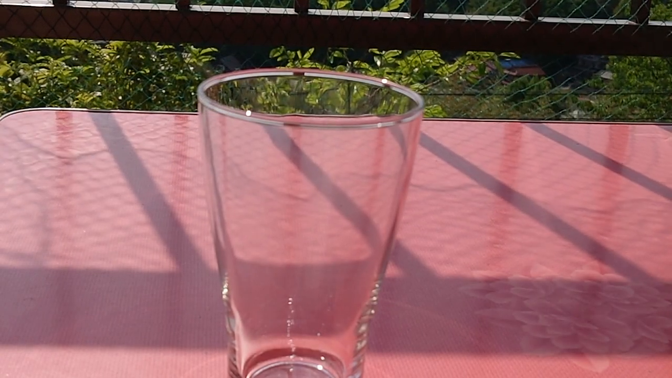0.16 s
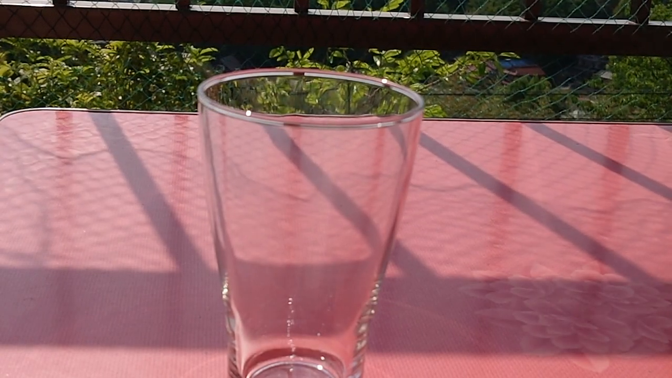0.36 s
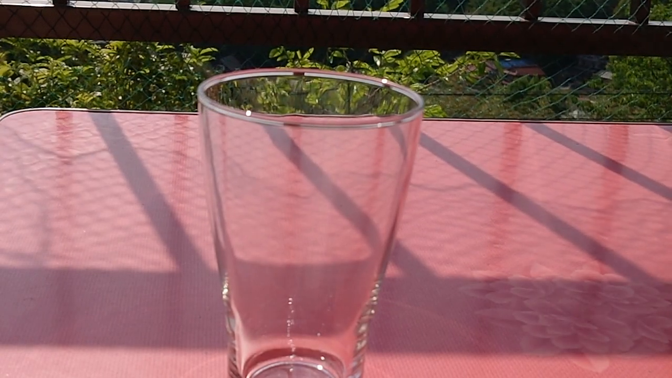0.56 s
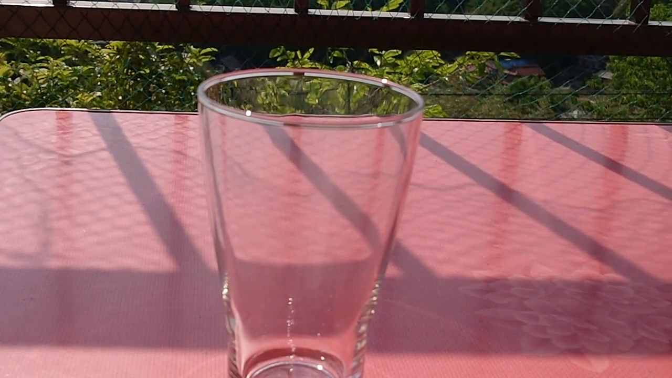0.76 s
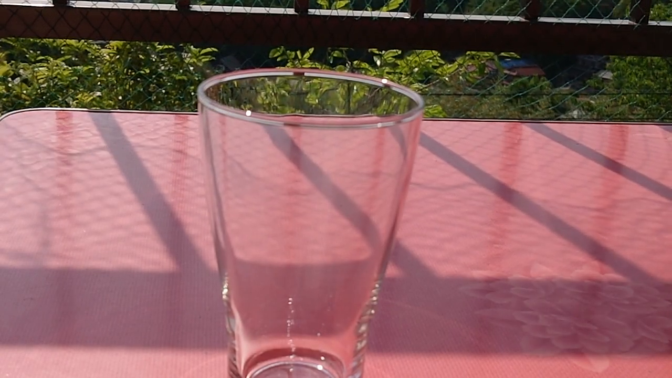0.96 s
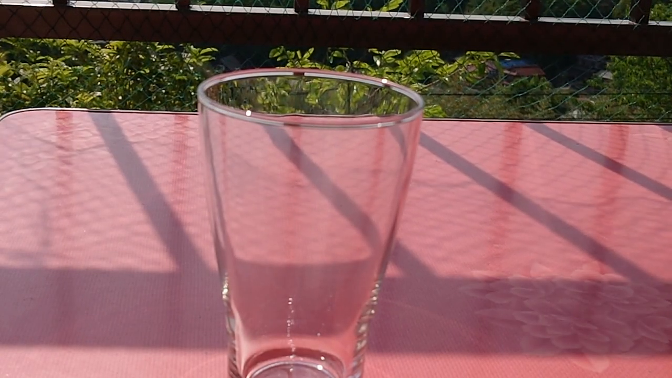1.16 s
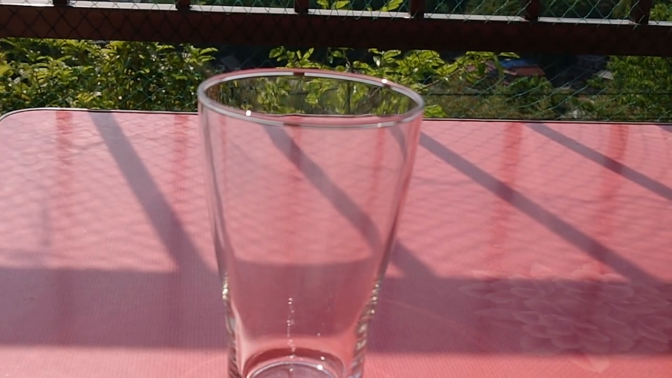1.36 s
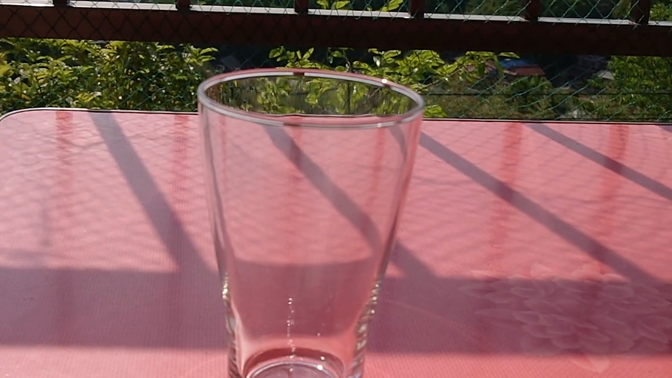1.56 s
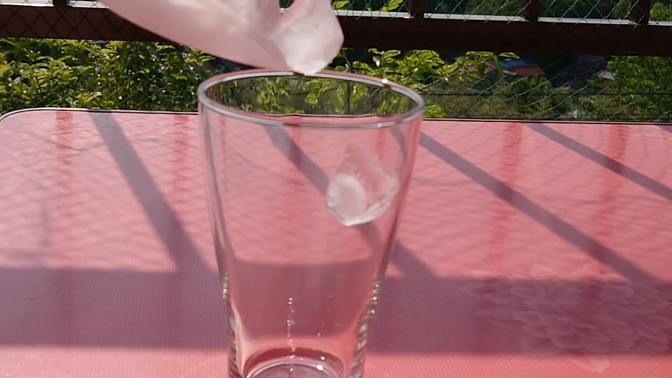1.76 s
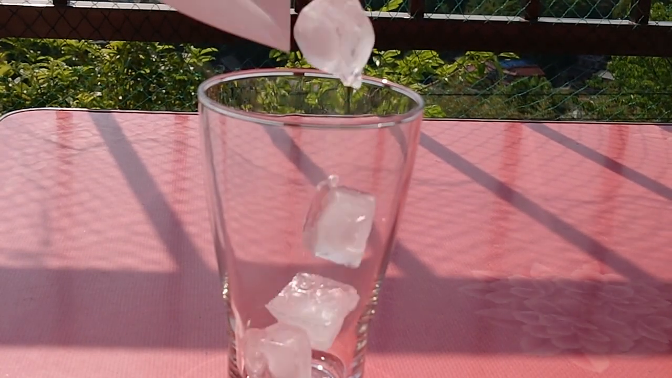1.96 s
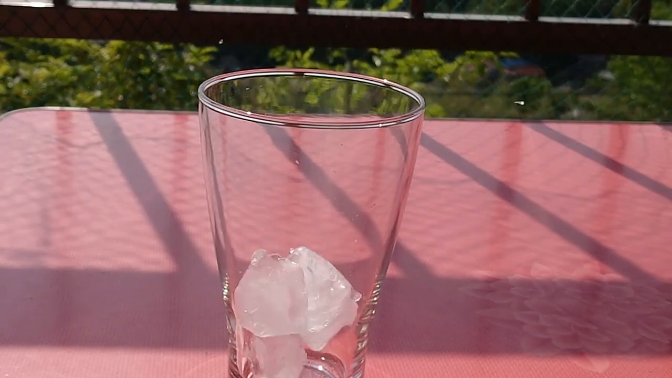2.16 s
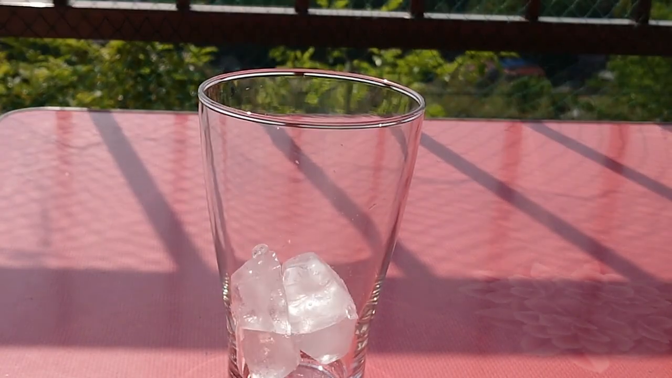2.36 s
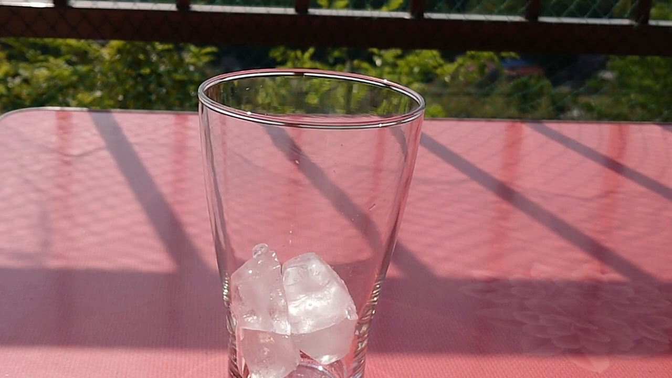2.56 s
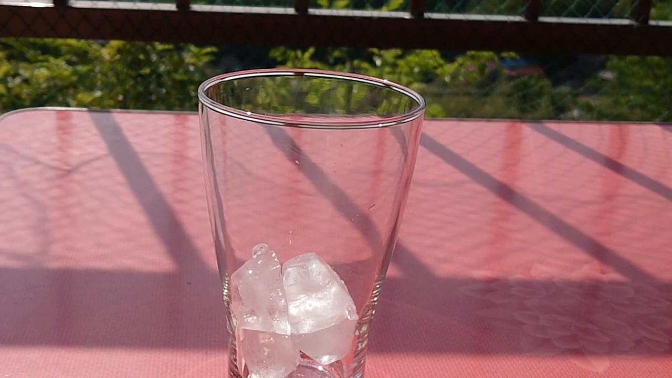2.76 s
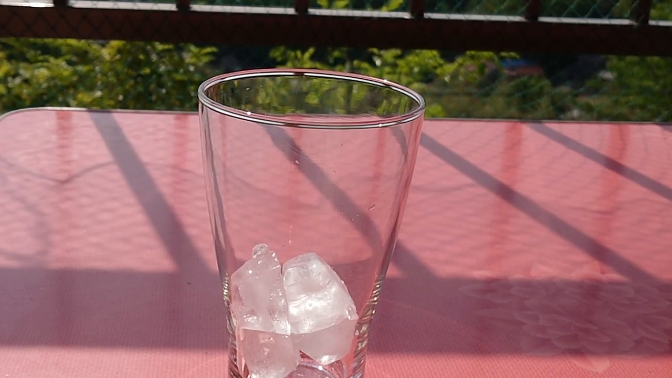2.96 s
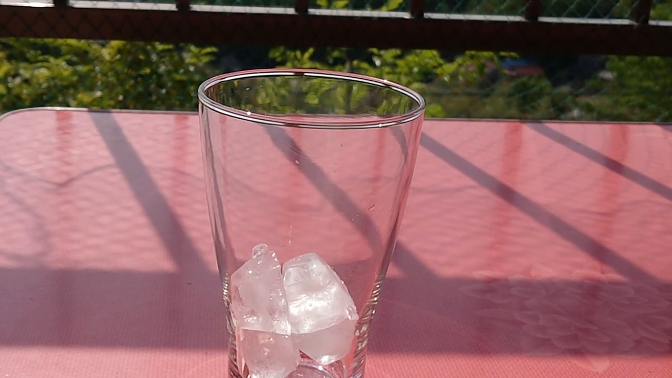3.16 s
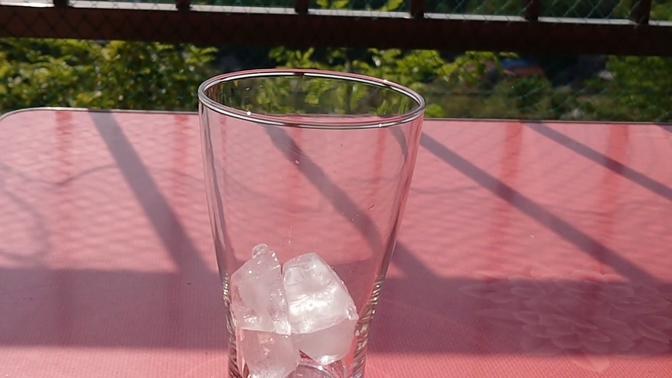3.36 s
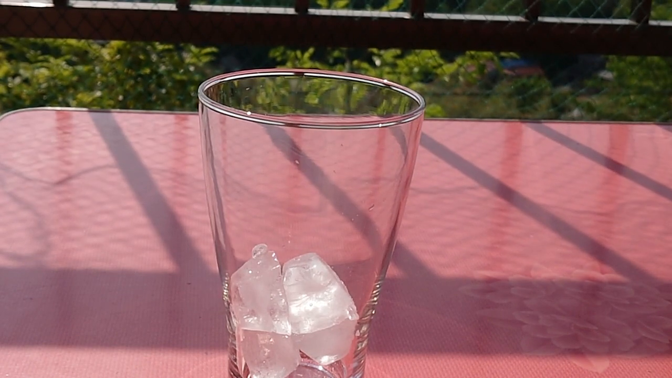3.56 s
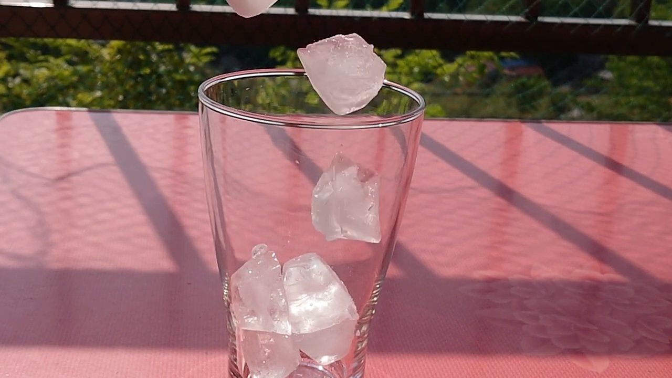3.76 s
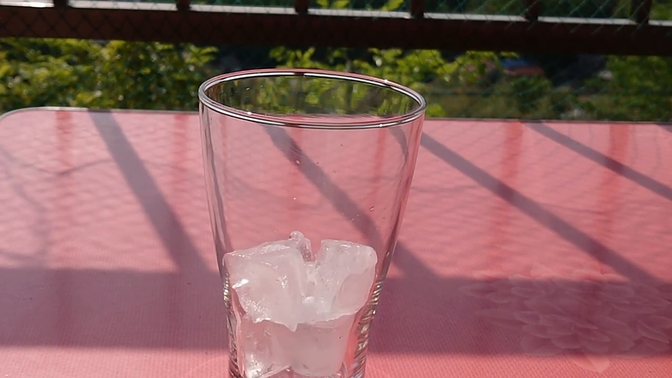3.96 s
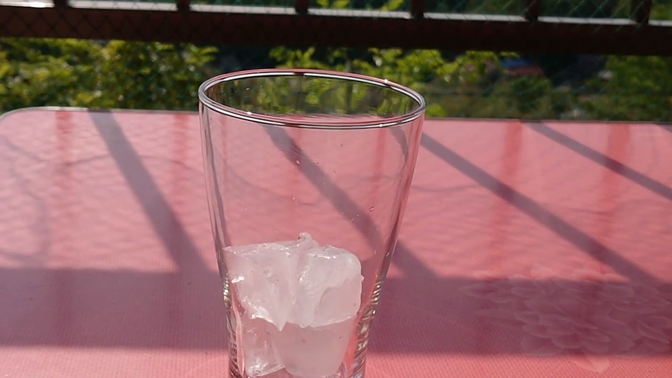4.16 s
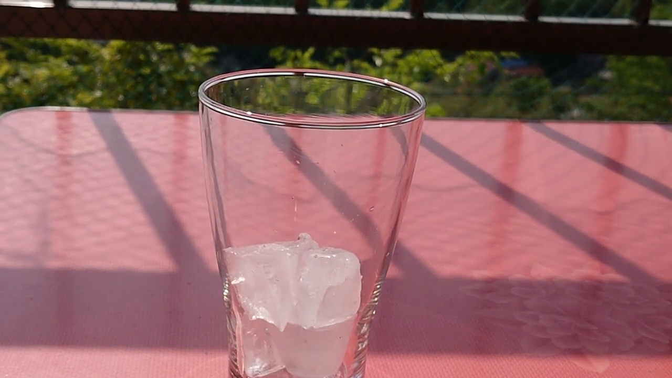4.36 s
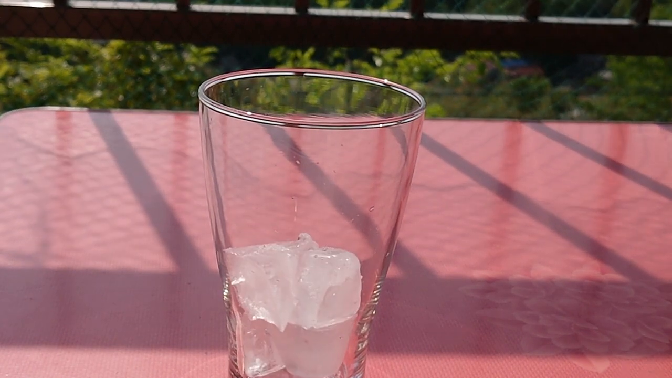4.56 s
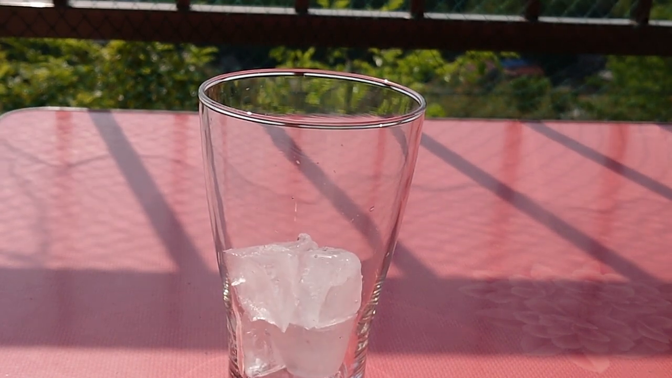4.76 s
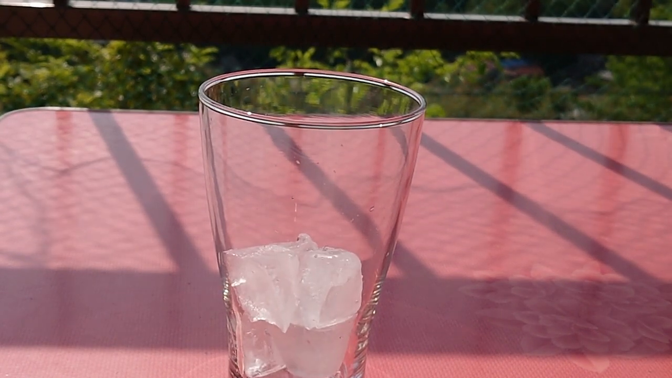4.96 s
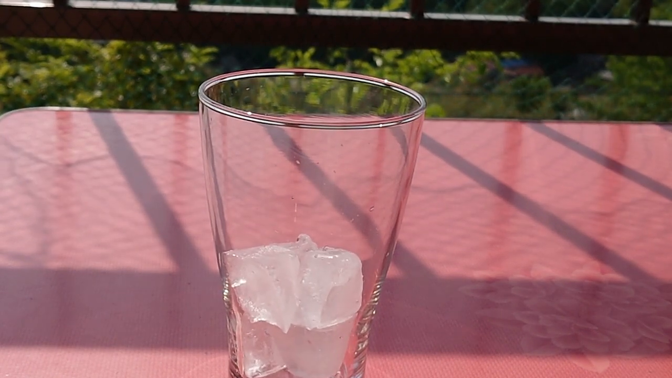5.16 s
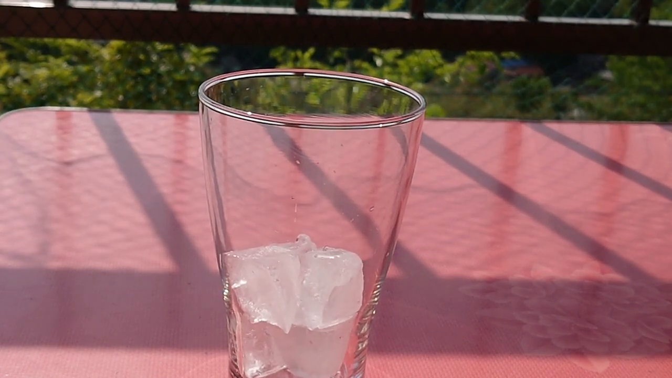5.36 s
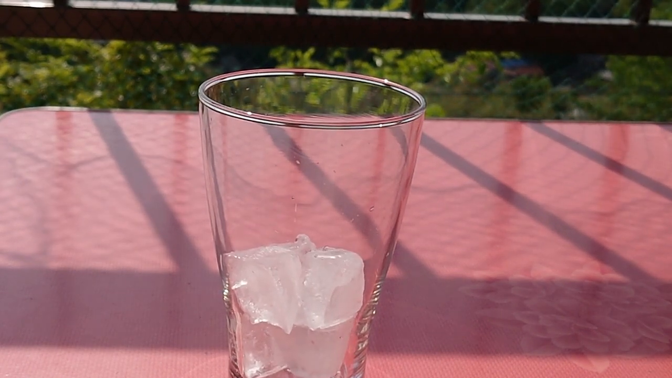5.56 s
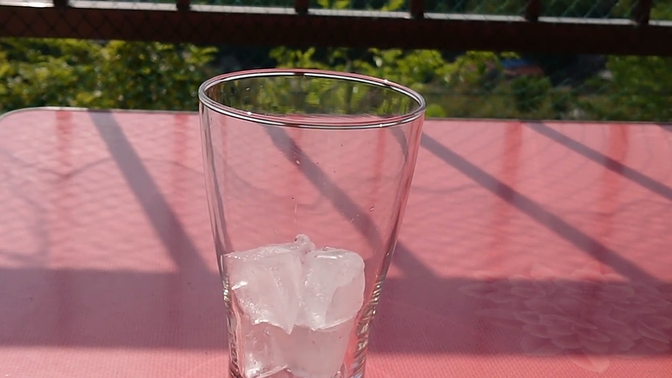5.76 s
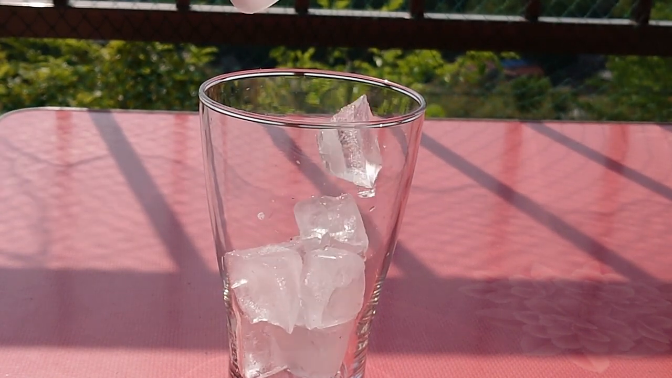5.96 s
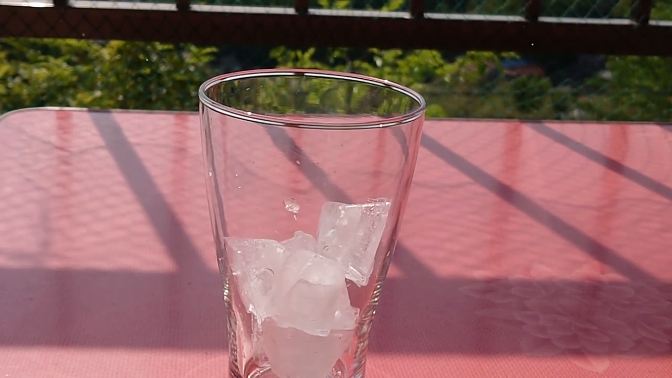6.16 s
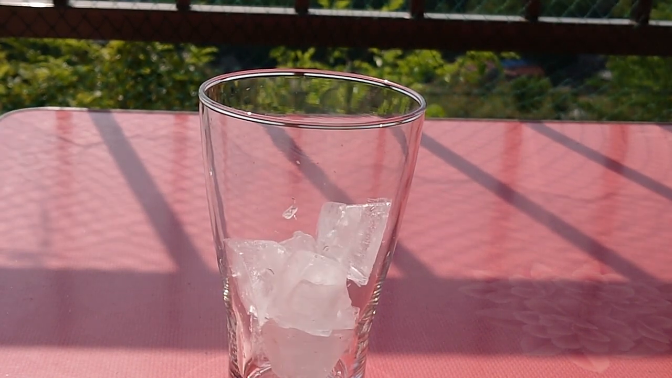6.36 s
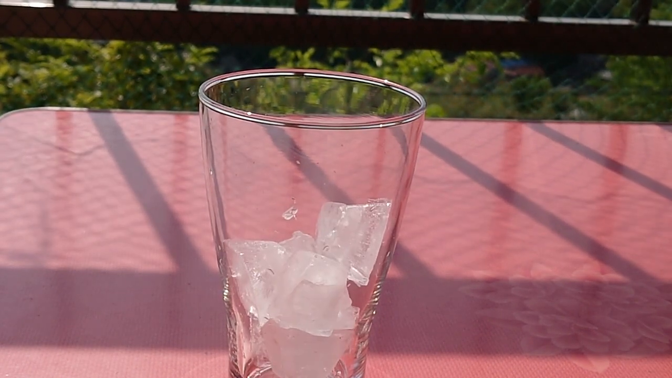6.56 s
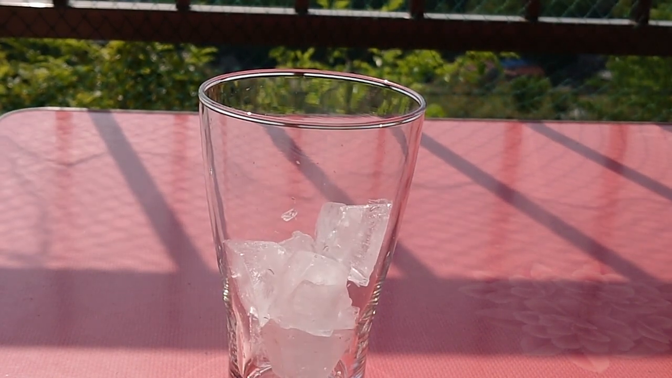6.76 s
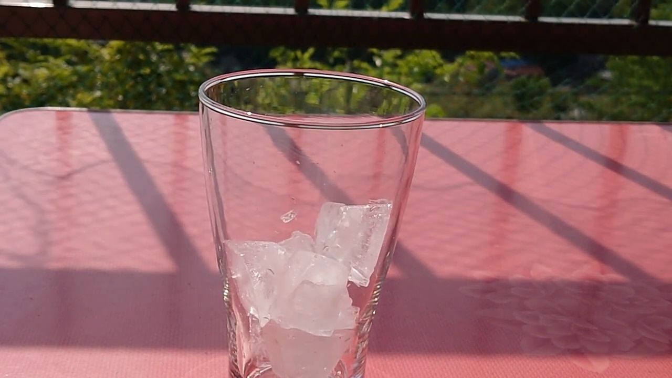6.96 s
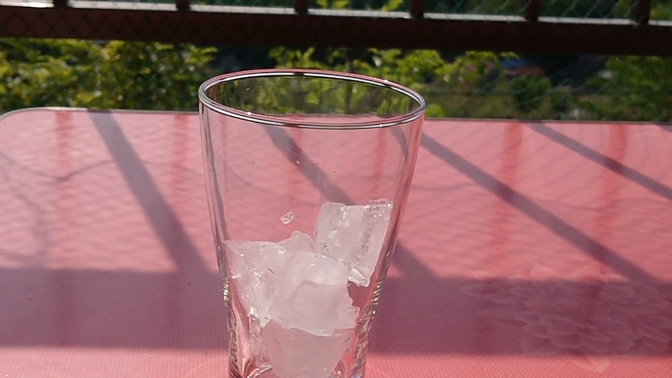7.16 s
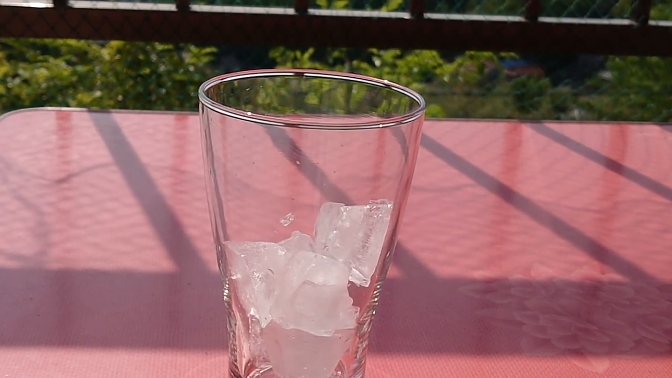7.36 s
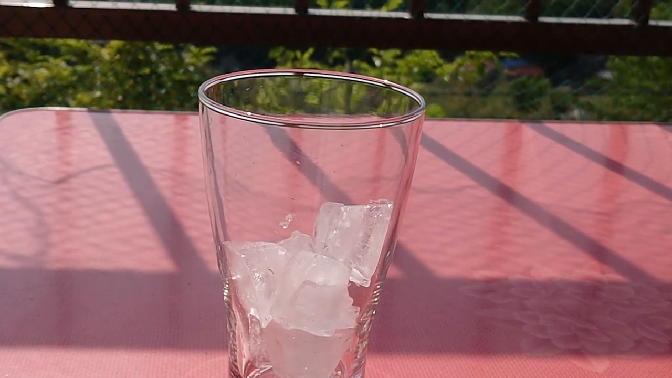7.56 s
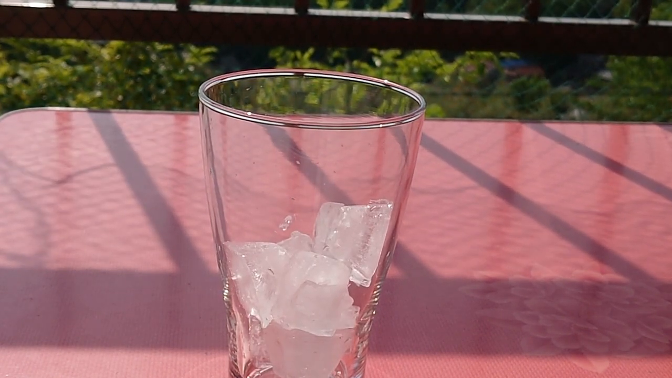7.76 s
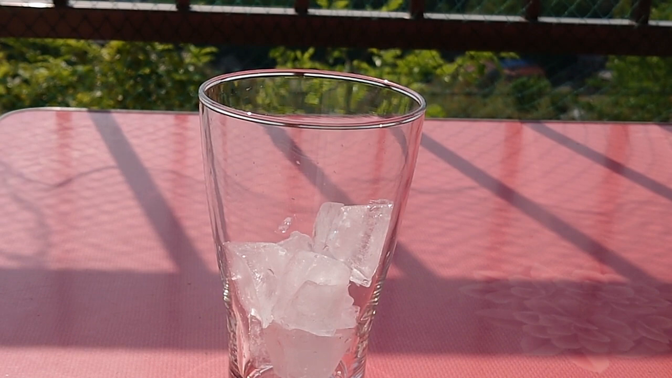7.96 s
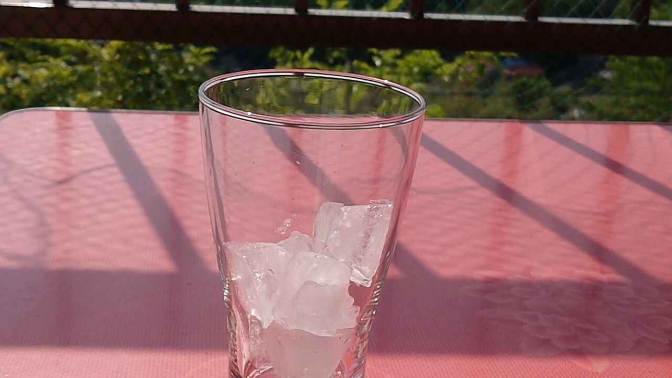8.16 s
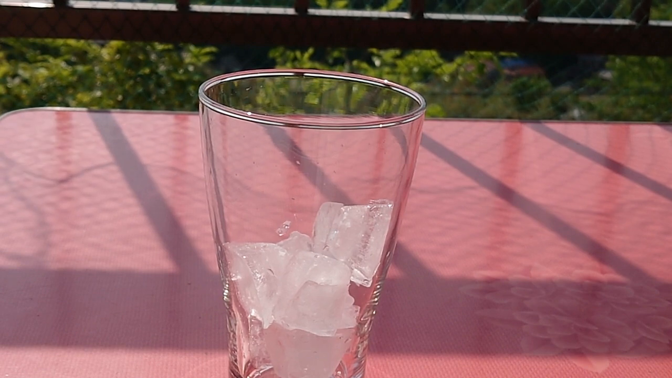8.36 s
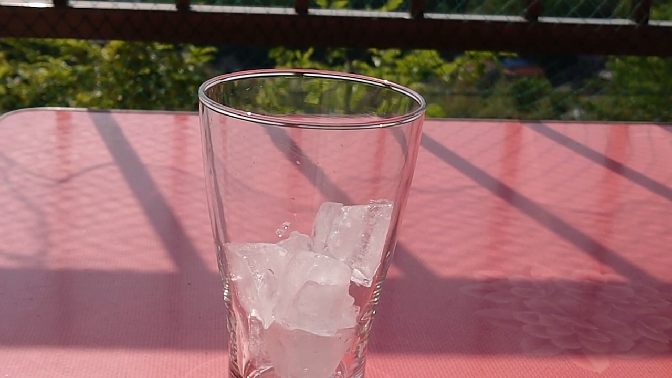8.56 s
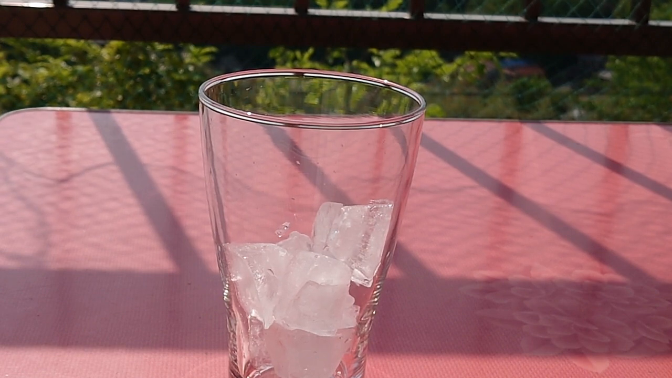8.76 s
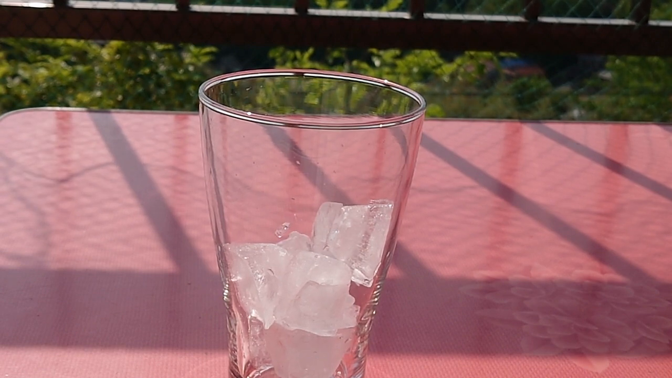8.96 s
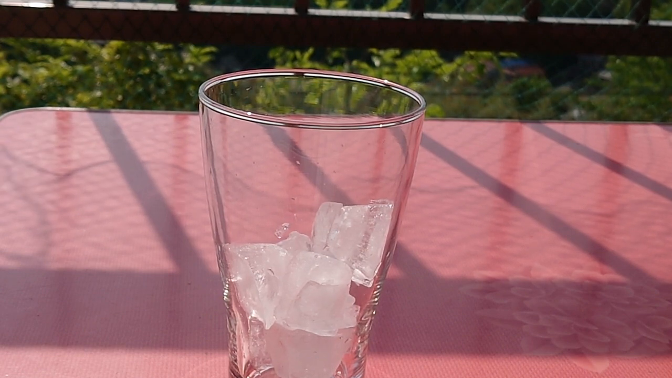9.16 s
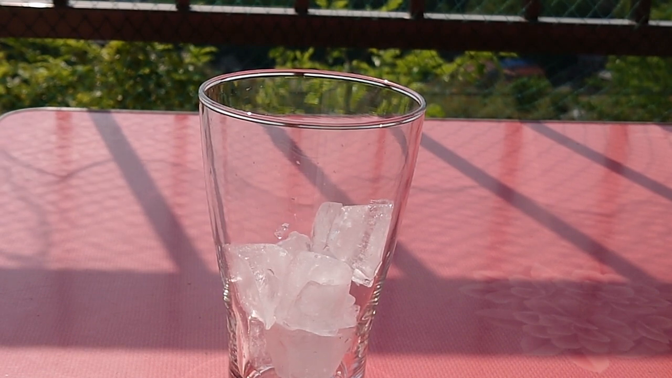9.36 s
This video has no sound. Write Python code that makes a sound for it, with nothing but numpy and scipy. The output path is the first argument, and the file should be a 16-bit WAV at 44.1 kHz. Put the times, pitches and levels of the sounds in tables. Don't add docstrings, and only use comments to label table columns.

```python
import sys
import numpy as np
from scipy import signal
from scipy.fft import rfft, irfft, next_fast_len
from scipy.io import wavfile
from scipy.ndimage import uniform_filter1d

SR = 44100
rng = np.random.default_rng(int(sys.argv[2]) if len(sys.argv) > 2 else 0)


def amp(db):
    return 10 ** (np.asarray(db, float) / 20)


def write(x):
    x = np.atleast_2d(x).T
    wavfile.write(sys.argv[1], SR, np.round(np.clip(x, -1, 1) * 32767).astype(np.int16))


N = 414540

# time in seconds, level in dB.
WIND = [(0, -47), (.4, -67), (1.501, -60.5), (2.95, -53.5), (3.4, -69), (3.851, -49.5), (4.4, -58.5),
        (5.5, -50), (5.93, -46.5), (6.3, -59.5), (6.6, -45.5), (7.3, -44.5), (7.37, -18.5), (7.49, -26),
        (7.55, -41.5), (8.3, -53.5), (8.6, -55), (9.4, -55.5)]
# frequency in Hz, density in dB per Hz.
GUST_SPECTRUM = [(12, -52.5), (20, -9), (68, 0), (182, -19.5), (303, -29.5), (1000, -55.5), (1300, -80),
                 (2200, -120)]
# frequency in Hz, density in dB per Hz.
HUM_SPECTRUM = [(59, -31), (100, -5), (291, -11.5), (452, -16), (3920, -32.5), (5720, -38), (7350, -59.5),
                (15000, -59)]
HUM_DB = -60
# start in seconds, length in seconds, start pitch in Hz, end pitch in Hz, level in dB.
BIRDS = [
    (1.19, .1, 3380, 3440, -64),
    (1.67, 0.13, 3330, 3230, -62),
    (1.67, 0.09, 1900, 1940, -63),
    (7.68, 0.09, 4500, 4000, -70),
]

# start in seconds, strongest in seconds, let go in seconds, hollow rattle in dB,
# icy rattle in dB relative to it.
STIRS = [(0, 0.17, 0.21, -23.5, -11.5), (.24, 0.36, 0.75, -36, -6.5), (0.635, 0.87, 1.06, -36.5, -14.5),
         (1.665, 2.15, 2.8, -65.5, 1), (2.03, 2.43, 2.28, -44.5, -11), (3.375, 3.46, 3.68, -66.5, -3),
         (2.698, 2.916, 3.22, -29.5, -12.5), (3.84, 4.2, 4.3, -71.5, 8), (4.438, 4.28, 4.55, -41, -3.5),
         (4.601, 4.751, 4.94, -27, -12), (5.025, 5.216, 5.44, -41, -7), (5.4, 5.479, 5.43, -65, 4.5),
         (5.592, 5.76, 5.84, -39.5, -13.5), (6.165, 6.13, 6.18, -40, -5.5), (6.765, 7.26, 7.4, -47.5, -13),
         (8.14, 8.197, 8.5, -60.5, -14), (8.763, 8.93, 9.16, -56, -5)]
STIR_START_DB, STIR_SAG_DB, STIR_RELEASE_DB_PER_S = -8, -14.5, 189
# time in seconds, pitch in Hz.
HOLLOW_PITCH = [
    (0, 727),
    (1.1, 706),
    (2.7, 775.7),
    (6.95, 801),
    (7.05, 550),
    (7.4, 612),
    (8.7, 873),
]
# frequency in Hz, level in dB under the click, t60 in seconds.
TUB_WALL = [(1380, -12, .02), (1950, -17, 0.015), (2480, -13, .036), (3130, -20, 0.025)]
# frequency in Hz, level in dB.
CRACK_SPECTRUM = [(500, -28), (1300, 4.5), (2500, -4.5), (5000, -11.5), (16000, -13.5)]

# time in seconds, ring in dB, click in dB, click in Hz.
SLAMS = [(.029, -16.5, -21, 2830), (.053, -13, -19, 3675), (.29, -14, -23, 2476), (.651, -26, -29.5, 1600),
         (1.023, -20.5, -24.5, 1580), (2.917, -4, -18.5, 5290), (2.945, -10.5, -18.5, 4170),
         (3.028, -13, -21.5, 2335), (3.051, -13, -21, 2270), (3.271, -24.5, -28, 2800),
         (4.489, -16, -21, 2250), (4.629, -4, -8.5, 2024), (5.212, -18.5, -24, 1520),
         (5.592, -13, -17.5, 1570), (5.863, -32, -35.5, 3750), (6.768, -20, -26.5, 3190),
         (8.358, -30.5, -43, 2880)]
# time in seconds, ring in dB.
WALL_KNOCKS = [(.09, -12), (.164, -18), (.667, -18.5), (.688, -12.5), (.761, -21.5), (.783, -8),
               (.812, -13.5), (.875, -19.5), (.915, -23), (.978, -25.5), (2.7, -19), (2.764, -13.5),
               (2.822, -19), (2.899, -14.5), (3.009, -12), (4.52, -20.5), (4.776, -19), (5.242, -30),
               (5.317, -15), (5.356, -20.5), (5.656, -24), (5.687, -28.5), (5.735, -38), (6.424, -45),
               (6.874, -24.5)]
WALL_CLICK_DB, WALL_CLICK_HZ = -14.5, 3180
# time in seconds, click in dB, click in Hz.
BUMPS = [(.133, -22.5, 3030), (.251, -28.5, 3070), (.391, -20, 4600), (1.123, -39, 3920),
         (2.712, -23, 4200), (3.217, -24.5, 1760), (3.45, -37, 2980), (4.451, -16.5, 2545),
         (4.694, -21, 3453), (4.743, -27.5, 2700), (4.756, -20, 3240), (4.917, -19, 3850),
         (5.264, -22.5, 1770), (5.373, -27, 2480), (5.616, -16, 4130), (5.759, -22, 3850),
         (7.072, -36.5, 3255), (7.142, -30, 1760), (7.281, -27.5, 1746), (8.409, -30.5, 2720)]
# time in seconds, click in dB, click in Hz.
CHINKS = [(.316, -20.5, 1600), (.699, -28, 3800), (2.745, -20.5, 1360), (3.086, -25, 2450),
          (3.116, -24.5, 2430), (3.145, -25, 2800), (3.166, -25, 2509), (3.25, -26.5, 2506),
          (4.441, -18.5, 2864), (4.615, -16.5, 2176), (4.845, -24, 4070), (4.988, -18, 1860),
          (5.006, -14.5, 1730), (5.132, -23, 2502), (5.161, -26, 1790), (6.856, -34, 4260),
          (6.939, -18, 3540), (6.997, -27.5, 1820), (8.775, -33, 1634), (8.896, -27.5, 5555),
          (8.948, -34, 5370)]
# time in seconds, click in dB, click in Hz.
TICKS = [(1.815, -31.5, 3150), (1.836, -46.5, 1770), (3.418, -33, 1720), (3.541, -44.5, 2423),
         (3.601, -41, 2100), (3.706, -40, 2430), (3.885, -42, 2380), (3.919, -35, 1830),
         (5.968, -42.5, 1660), (6.009, -43, 2347), (6.074, -43, 1680), (6.112, -31.5, 1853),
         (6.513, -54, 2850), (6.569, -50, 3230), (6.705, -41.5, 3644), (7.213, -38.5, 2680),
         (7.248, -33, 2933), (8.617, -50, 4470), (8.878, -35.5, 1630), (9.069, -44, 3180),
         (9.127, -42, 4310)]
BUMP_RING_DB, CHINK_RING_DB, TICK_RING_DB = -0.5, -7, -21
TICK_TONE_DB, TICK_T60_S = -3, .025
# time in seconds, ring in dB, click in dB, click in Hz.
LANDINGS = [(2.035, -12, -27.5, 1890), (2.063, -47.5, -18, 5700), (2.088, -57.5, -35, 4830),
            (2.136, -14.5, -18.5, 4260), (2.198, -20, -22, 6150), (2.302, -19.5, -23, 1610),
            (2.385, -25.5, -35.5, 1690), (3.996, -16, -15.5, 6140), (4.007, -23.5, -19.5, 2690),
            (4.103, -24, -30, 1610), (4.262, -36.5, -49.5, 1620), (6.181, -24, -26, 3020),
            (6.207, -21, -20.5, 4900), (6.232, -31, -34, 5800)]

# time in seconds, level in dB, centre in Hz.
SNAPS = [(0.0303, -34.5, 10500), (0.0498, -31.5, 9740), (0.1126, -37, 10420), (0.2703, -47.5, 9670),
         (0.376, -42, 9730), (0.5023, -49, 9950), (0.5352, -40, 10600), (0.618, -49, 9500),
         (0.6429, -39, 10400), (0.6863, -37, 10400), (0.7497, -42.5, 9850), (0.819, -33.5, 9800),
         (0.9867, -37.5, 10100), (1.0086, -40, 9870), (1.1218, -52, 10700), (2.0592, -35, 11500),
         (2.2283, -38.5, 9760), (2.2672, -38.5, 10700), (2.2977, -38, 10760), (2.6983, -47.5, 10000),
         (2.7437, -42, 10660), (2.8305, -45, 8700), (2.9198, -31, 9850), (2.9437, -29.5, 9200),
         (2.9692, -34.5, 9580), (3.0325, -31, 11100), (3.045, -27, 9780), (3.0849, -43, 11400),
         (3.1143, -45.5, 9850), (3.2161, -46, 10400), (3.2475, -43, 9420), (3.9025, -48.5, 9900),
         (3.9868, -35, 10700), (4.4388, -38, 8420), (4.6154, -37, 9910), (4.6289, -30, 9370),
         (4.6738, -31.5, 9380), (4.6932, -25.5, 15560), (4.7571, -39, 8620), (4.8449, -49, 8980),
         (4.8718, -41, 8840), (4.9162, -33, 15400), (4.9861, -26, 10900), (5.0255, -30.5, 9860),
         (5.0704, -46, 9880), (5.1487, -45, 9860), (5.1617, -45, 10300), (5.2135, -46, 9880),
         (5.2619, -46, 9800), (5.5927, -49, 9560), (5.6151, -36.5, 8840), (5.7598, -58, 8810),
         (6.9371, -43, 8600)]
SNAP_DB, SNAP_T60_S = 9.5, 0.049
# time in seconds, ring in dB.
ROLLS = [(0.08, -8.5), (0.122, -11), (0.224, -27), (0.269, -20), (0.356, -19), (0.441, -28.5), (0.471, -32),
         (0.561, -28), (0.855, -16), (1.007, -26), (2.747, -12), (2.802, -20), (2.873, -17), (3.069, -19.5),
         (4.552, -30.5), (4.708, -18), (4.837, -19.5), (4.974, -22.5), (5.019, -20.5), (5.091, -25.5),
         (5.149, -28.5), (5.339, -21), (5.88, -34)]
ROLL_DB = -1.5
# time in seconds, level in dB, pitch in Hz,
# t60 in seconds.
NOTES = [(3.058, -22, 2460, 0.056), (3.085, -26, 2460, 0.084), (3.123, -33, 2459, .12),
         (3.123, -29, 3170, .06), (3.144, -25, 2450, .1), (3.166, -26, 2480, 0.15),
         (3.166, -34, 3140, 0.088), (3.284, -33, 2460, 0.13), (3.417, -44, 2507, .15),
         (3.601, -43.5, 2450, .09), (3.601, -57, 5000, 0.081), (3.707, -45, 2530, 0.1),
         (4.03, -30.5, 778, .25), (4.104, -32.5, 820, 0.18), (5.004, -29, 2500, .2),
         (5.285, -26, 1810, .05), (4.905, -26.5, 1303, 0.045), (5.582, -36, 1110, .03),
         (.158, -16, 960, .07), (.136, -21, 3150, .05), (.393, -27, 4670, .05), (5.14, -33, 2530, .08),
         (6.112, -30, 1723, 0.055), (6.112, -34, 2400, .05), (6.126, -45, 1800, .03), (6.183, -36, 830, .1),
         (6.208, -37, 2840, 0.16), (6.231, -36.5, 828, 0.16), (6.79, -48, 820, 0.046),
         (6.812, -31.5, 790, 0.045), (6.832, -34, 826, 0.046), (6.9, -45, 815, .06),
         (6.94, -32.5, 3365, 0.24), (6.94, -36, 781, .1), (7.143, -29, 579, 0.085),
         (8.777, -47, 1624, 0.23), (8.878, -45, 1610, .12), (8.93, -46, 1570, 0.28)]

DROPS_S = [
    1.96,
    3.98,
    6.16,
]
# time in seconds, then ring in dB of the low, middle and high mode.
CONTACTS = [(1.962, -43, -40, -70), (1.988, -48, -38.5, -50), (2.059, -54.5, -38, -58),
            (2.083, -27.5, -27.5, -26), (2.137, -33, -32.5, -48), (2.152, -25, -28.5, -39),
            (2.197, -47, -34.5, -50), (2.218, -32.5, -28.5, -48), (2.243, -34.5, -24, -31.5),
            (2.262, -54, -27, -41), (2.292, -31, -30.5, -39), (2.381, -40, -36, -56),
            (3.988, -40, -38, -52), (3.999, -43.5, -23.5, -38), (4.005, -20, -26, -26),
            (4.023, -21.5, -22, -19.5), (4.059, -25.5, -28.5, -28), (4.089, -35, -36.5, -40),
            (4.11, -41.5, -38.5, -46), (4.136, -50, -40.5, -39.5), (4.218, -55, -50.5, -55.5),
            (6.16, -52, -42, -67), (6.18, -32.5, -51, -38), (6.208, -40, -38, -42),
            (6.228, -52, -41.5, -44), (6.252, -54, -50.5, -60), (6.271, -63, -53, -50.5)]
# gain in dB of the close pair of modes, gain in dB of the finest modes.
SPOTS = [(-16, -2), (-7.5, -5), (9, 5), (0, 0), (-5, -7), (-2, -4), (-3.5, -4), (2, -3), (3, -0.5),
         (-0.5, -8), (0.5, 0), (-5.5, -12), (-6, 1), (9, -2), (1.5, 2), (-5, 2), (-1, 2), (3.5, -4.5),
         (-1, -3), (-2.5, -7), (-4, -4), (-18, -3), (-6, 5.5), (3, 4), (3, 4), (-8, -1), (-7, -6)]
# frequency in Hz, level in dB within the family, t60 in seconds, family index
GLASS_MODES = [(1501, -4, .36, 0), (2449, -3, .58, 1), (4312, -2, .46, 2), (5884, 0, .15, 3),
               (5992, -2, .15, 3), (6756, -4, .13, 3), (6993, -6, .13, 3), (8440, -8, .16, 3),
               (9722, -7, .14, 3), (10815, -8, .14, 3), (11493, -7, .14, 3), (10150, -11, .14, 3),
               (12974, -9, .14, 3), (12199, -9, .16, 3), (13797, -7, .14, 3), (15315, -6, .12, 3)]
PAIR_TOP_HZ = 6300
FINE_DB = [
    -8,
    -12,
    -2,
]
FINE_FADE_DB_PER_S = 12

# time in seconds, level in dB.
THUDS = [
    (2.913, -21),
    (6.98, -32),
    (8.357, -13),
    (8.376, -18.5),
    (8.391, -22),
    (8.622, -39),
    (8.882, -33.5),
    (8.97, -36.5),
]
LANDING_THUD_DB = -6

SPARKLE_OPEN_DB, SPARKLE_ASIDE_DB, SPARKLE_GLASS_DB = 3, 1.5, -7
TUB_ASIDE_S, SETTLE_S = 5.2, .5
# frequency in Hz, level in dB.
MIC = [(25, -13.5), (55, 3.5), (5800, 1.5), (6900, -8), (7600, -25.5), (8500, -12), (10000, -8.5),
       (13000, -18), (15800, -15), (16600, -58)]
# frequency in Hz, left minus right in dB.
LEAN = [(80, -0.5), (250, -3.5), (700, -3.5), (2500, 2.5), (5000, 2.5), (9000, 1)]


def evened(x):
    return x / np.sqrt(np.mean(x ** 2) + 1e-20)


def add(mix, s, sound):
    part = mix[:, max(round(s * SR), 0):][:, :sound.shape[1]]
    part += sound[:, :part.shape[1]]


def coloured(x, points):
    size = next_fast_len(x.shape[-1])
    hz, db = np.transpose(points)
    gain = amp(np.interp(np.log(np.fft.rfftfreq(size, 1 / SR) + 1), np.log(hz + 1), db))
    return irfft(rfft(x, size) * gain, size)[..., :x.shape[-1]]


def wind():
    s, db = np.transpose(WIND)
    level_db = np.interp(np.arange(N) / SR, s, db)
    a, b, lumps = rng.standard_normal((3, N))
    lumps = evened(uniform_filter1d(uniform_filter1d(lumps, 1200), 1200))
    lean_db = .32 * np.clip(level_db + 52, 0, 30)
    ports = evened(coloured(np.array([a, .3 * a + .95 * b]), GUST_SPECTRUM))
    push = ports * amp(level_db + 3.5 * lumps + np.array([[.5], [-1.5]]) * lean_db)
    return .11 * np.tanh(push / 0.1)


def hum():
    a, b = rng.standard_normal((2, N))
    bass = coloured(a - b, [(250, -2.0), (700, -23.5)])
    return amp(HUM_DB) * evened(coloured(np.array([a, b + bass]), HUM_SPECTRUM))


def ring(hz, t60_s, lag_s=0., rise_s=0.00076):
    t = np.arange(2000) / SR - np.array([[max(lag_s, 0)], [max(-lag_s, 0)]])
    t = np.maximum(t, 0)
    return amp(-60 * t / t60_s) * (1 - np.exp(-t / rise_s)) * np.sin(2 * np.pi * hz * t)


def hollow(hz, draw):
    swing = ring(hz, 0.024)
    overtone = amp(-20.0) * ring(hz * (2.2 + 0.1 * draw[0]), 0.019)
    linger = amp(-22) * ring(hz * (.75 + .15 * draw[1]), 0.076)
    return swing + overtone + linger


def click(hz, draw, t60_s, crack_db=-6.0):
    lag_s = 0.00023 * (draw[0] - .5)
    chink = ring(hz, t60_s, lag_s, .0001)
    modes = sum(amp(-6.5 - 0.43 * d) * ring(hz * (0.582 + 1.6 * d), t60_s, lag_s, .0001) for d in draw[1:4])
    wall = sum(amp(db + 4.2 * (d - .5)) * ring(wall_hz * (.97 + .06 * d), wall_t60_s, lag_s)
               for (wall_hz, db, wall_t60_s), d in zip(TUB_WALL, draw[1:]))
    a, b = rng.standard_normal((2, 2000))
    crack = np.array([np.roll(a, round(lag_s * SR)), 0.26 * a + 1.7 * b])
    crack = coloured(coloured(crack, CRACK_SPECTRUM), [(hz / 2, -9), (hz, 0), (hz * 2, -7)])
    n = np.arange(2000)
    crack = evened(crack) * amp(crack_db - 60 * n / SR / 0.046) * np.minimum(n / 25, 1)
    side = amp(7 * (draw[4] - .5) * np.array([[1], [-1]]))
    return side * (chink + modes + wall + crack)


def blows():
    rows = SLAMS + LANDINGS + [(s, db, db + WALL_CLICK_DB, WALL_CLICK_HZ) for s, db in WALL_KNOCKS]
    for table, ring_db in ((BUMPS, BUMP_RING_DB), (CHINKS, CHINK_RING_DB), (TICKS, TICK_RING_DB)):
        rows += [(s, db + ring_db, db, hz) for s, db, hz in table]
    return rows


def swarm(shapes, per_s, spread_db):
    size = amp(spread_db * np.minimum(rng.exponential(1, N), 4)) * (rng.random(N) < per_s / SR)
    which = rng.integers(0, len(shapes), N)
    x = sum(signal.oaconvolve((size * (which == k))[None], shape)[:, :N] for k, shape in enumerate(shapes))
    return x / np.sqrt(uniform_filter1d((x ** 2).mean(0), 4000) + 1e-9)


def aftershocks(column, t60_s):
    rows, kicks = np.array(blows()), np.zeros(N)
    kicks[(rows[:, 0] * SR).astype(int)] = amp(rows[:, column]) ** 2
    decay = amp(-120 * np.arange(8000) / SR / t60_s)
    return np.sqrt(abs(signal.oaconvolve(kicks, decay)[:N]))


def rattle():
    t = np.arange(N) / SR
    low = amp(-15.5) * aftershocks(column=1, t60_s=0.078)
    icy = amp(-13.5) * aftershocks(column=2, t60_s=0.12)
    stir_db = [STIR_START_DB, 0, STIR_SAG_DB, STIR_SAG_DB - STIR_RELEASE_DB_PER_S]
    for start, top, end, db, icy_db in STIRS:
        effort = (t >= start) * amp(db + np.interp(t, [start, top, end, end + 1], stir_db))
        low += effort * amp(-2.0)
        icy += effort * amp(icy_db + 11.5)
    draws = rng.random((14, 8))
    hollows = [hollow(700 + 220 * d[7], d[5:]) for d in draws[:5]]
    clicks = [click(hz, d, .014, -7.0) for hz, d in zip(np.geomspace(1150, 4300, len(draws)), draws)]
    return low * swarm(hollows, 180, 3.6) + icy * swarm(clicks, 650, 4.86)


def knocks():
    out, rows = np.zeros((2, N)), blows()
    for (s, low_db, ice_db, ice_hz), draw in zip(rows, rng.random((len(rows), 8))):
        low_hz = np.interp(s, *np.transpose(HOLLOW_PITCH)) * (0.9764 + .1 * draw[7])
        body = amp(low_db + 1.5) * hollow(low_hz, draw[5:])
        add(out, s, body + amp(ice_db - 1.5) * click(ice_hz, draw, .019))
    for s, db, hz in TICKS:
        add(out, s, amp(db + TICK_TONE_DB) * ring(hz, TICK_T60_S))
    return out


def balcony(x):
    taps, t = np.zeros((2, 16000)), np.arange(16000) / SR
    at = np.arange(100, 15980, 20) + rng.integers(0, 20, (2, 794))
    np.put_along_axis(taps, at, rng.choice([-1., 1.], at.shape), 1)
    taps[1] += coloured(taps[0] - taps[1], [(500, 1.5), (1300, -31.5)])
    dull = coloured(taps, [(1500, -5.5), (4000, -33.5)])
    tail = dull * amp(-0.5 - 60 * t / 0.22) + (taps - dull) * amp(-60 * t / .16)
    return signal.oaconvolve(x, tail / np.linalg.norm(tail[0]), axes=1)[:, :N]


def snaps():
    out, t = np.zeros((2, N)), np.arange(2000) / SR
    for (s, db, hz), burst in zip(SNAPS, rng.standard_normal((len(SNAPS), 2, 2000))):
        burst = evened(coloured(burst, [(5000, -30), (hz * .8, -6), (hz, 0), (hz * 1.8, -4), (20000, -6)]))
        add(out, s, amp(db + SNAP_DB - 60 * t / SNAP_T60_S) * np.minimum(t / .0006, 1) * burst)
    return out


def rolls():
    out = np.zeros((2, N))
    for (s, db), draw in zip(ROLLS, rng.random((len(ROLLS), 3))):
        hz = np.interp(s, *np.transpose(HOLLOW_PITCH)) * (1 + .08 * draw[2])
        add(out, s, amp(db + ROLL_DB) * hollow(hz, draw))
    return out


def notes():
    out, t = np.zeros((2, N)), np.arange(8000) / SR
    for (s, db, hz, t60_s), turn in zip(NOTES, rng.uniform(-0.65, .5, len(NOTES))):
        tone = np.sin(2 * np.pi * hz * t + np.array([[turn], [-turn]]))
        add(out, s, amp(db - 60 * t / t60_s) * np.minimum(t / .001, 1) * tone)
    return out


def birds():
    out = np.zeros((2, N))
    for s, length_s, hz0, hz1, db in BIRDS:
        n = int(length_s * SR)
        hz = np.linspace(hz0, hz1, n) + 1000 * uniform_filter1d(rng.standard_normal(n), 60)
        add(out, s, amp(db) * np.sin(2 * np.pi * np.cumsum(hz) / SR) * np.hanning(n) * np.ones((2, 1)))
    return out


def fine_db(s, middle_db, high_db):
    drop = max(np.searchsorted(DROPS_S, s + .01) - 1, 0)
    return max(middle_db, high_db) + FINE_DB[drop] - FINE_FADE_DB_PER_S * (s - DROPS_S[drop])


def glass():
    out = np.zeros((2, N))
    hz, db, t60_s, family = np.transpose(GLASS_MODES)[:, :, None]
    family = np.round(family).astype(int)
    fine, pair = family == 3, hz < PAIR_TOP_HZ
    fade = 40
    ends_s = [row[0] for row in CONTACTS[1:]] + [N / SR]
    draws = rng.random((len(CONTACTS), 3, len(GLASS_MODES), 1))
    for row, spot_db, end_s, draw in zip(CONTACTS, SPOTS, ends_s, draws):
        s = row[0]
        n = np.arange(round(s * SR), round(min(end_s, s + 0.4) * SR) + fade)
        damping = 1 + .3 * (s - 2) * np.where(family == 2, .3, 1)
        struck_db = np.append(row, fine_db(s, *row[2:]))[1 + family]
        level_db = struck_db + db + 6 - 60 * (n - n[0]) / SR * damping / t60_s
        level_db += fine * (17.0 * (draw[2] - .5) + np.where(pair, *spot_db))
        buzz = uniform_filter1d(rng.standard_normal(level_db.shape), 150, 1)
        chatter = 1 + fine * np.where(pair, 10.0, 6.5) * buzz
        swing = amp(level_db) * chatter * np.minimum(np.minimum(n - n[0], n[-1] - n) / fade, 1)
        for port, sign in enumerate((1, -1)):
            phase = .25 * draw[0] + sign * (0.088 + 0.31 * draw[1])
            out[port, n] += (swing * np.cos(2 * np.pi * hz * n / SR + phase)).sum(0)
    return out


def thuds():
    out, t = np.zeros((2, N)), np.arange(9000) / SR
    shudder_spectrum = [(70, -27), (150, 2.5), (300, 1.5), (480, -7.0), (1500, -17.5), (6000, -38.0)]
    for s, db in THUDS + [(row[0], row[1] + LANDING_THUD_DB) for row in LANDINGS]:
        shudder = evened(coloured(rng.standard_normal(9000), shudder_spectrum))
        ports = np.array([shudder, 0.79 * shudder + .5 * shudder[::-1]])
        add(out, s, amp(db) * ring(310, .03))
        add(out, s, amp(db - 14 - 60 * t / 0.322) * np.minimum(t / 0.0054, 1) * ports)
    return out


def scene():
    ice = knocks() + rattle()
    ice = ice + amp(-4) * balcony(ice)
    sparkle = coloured(ice, [(6000, -40), (7500, 0)])
    t = np.arange(N) / SR
    since_s = t - np.array(DROPS_S)[:, None]
    in_glass = ((since_s > 0) & (since_s < SETTLE_S)).any(0)
    tub_db = np.where(t > TUB_ASIDE_S, SPARKLE_ASIDE_DB, SPARKLE_OPEN_DB)
    ice = ice + sparkle * (amp(np.where(in_glass, SPARKLE_GLASS_DB, tub_db)) - 1)
    air = wind() + hum() + birds()
    return ice + air + snaps() + rolls() + notes() + glass() + thuds()


def low_pass(x):
    return signal.sosfilt(signal.butter(12, 17110, fs=SR, output="sos"), x)


def record(dry):
    hiss = amp(-86.5) * rng.standard_normal(dry.shape)
    hz, db = np.transpose(LEAN)
    ports = [coloured(x, np.transpose([hz, sign * db / 2])) for x, sign in zip(dry, (1, -1))]
    heard = coloured(np.array(ports), MIC)
    return low_pass(1.193 * np.tanh(heard / 1.442) + hiss)


dry = scene()
out = record(dry)
write(out)
```